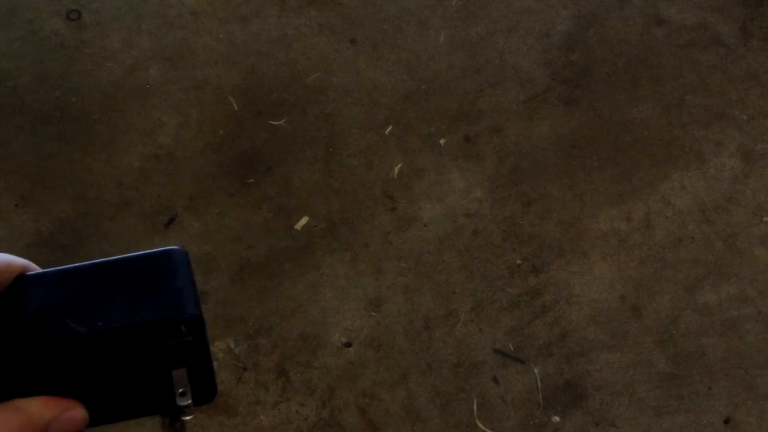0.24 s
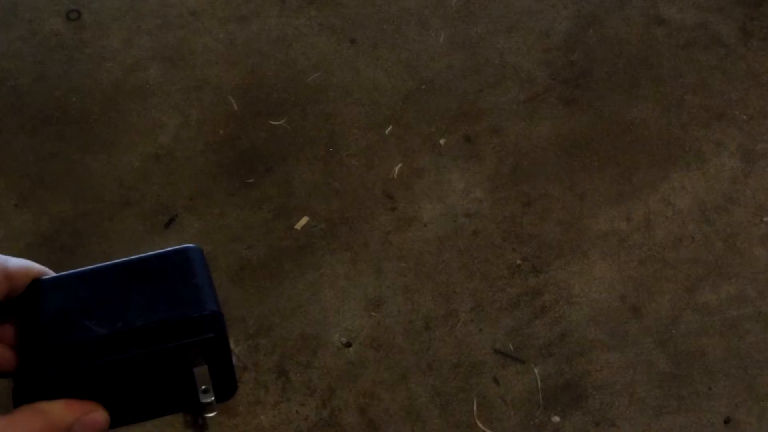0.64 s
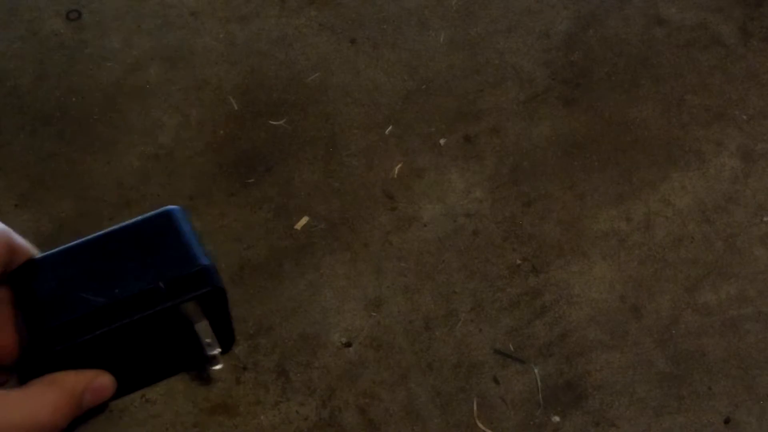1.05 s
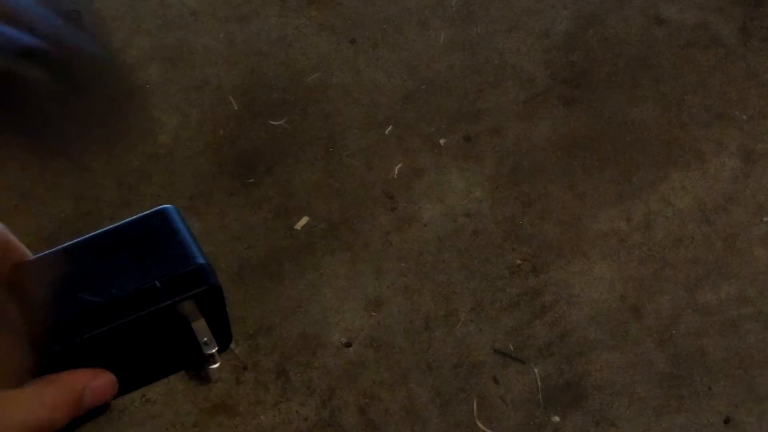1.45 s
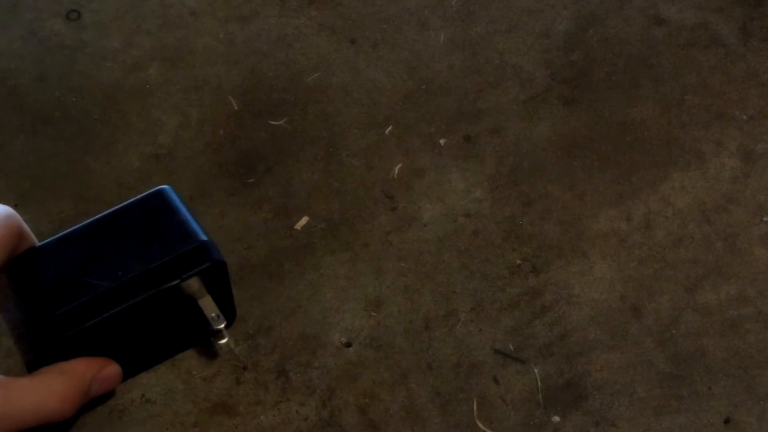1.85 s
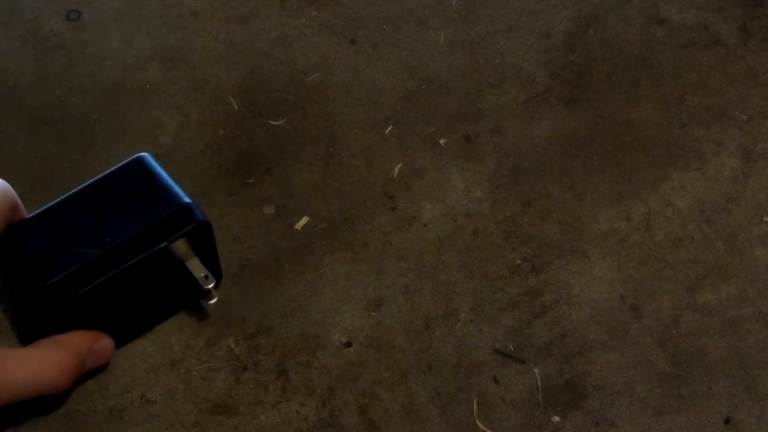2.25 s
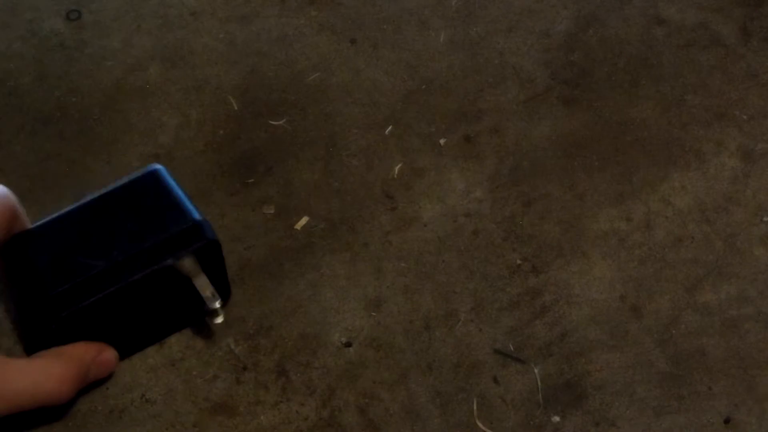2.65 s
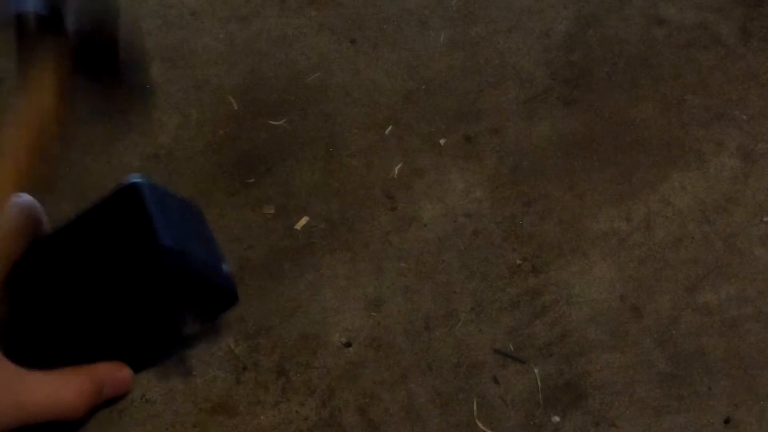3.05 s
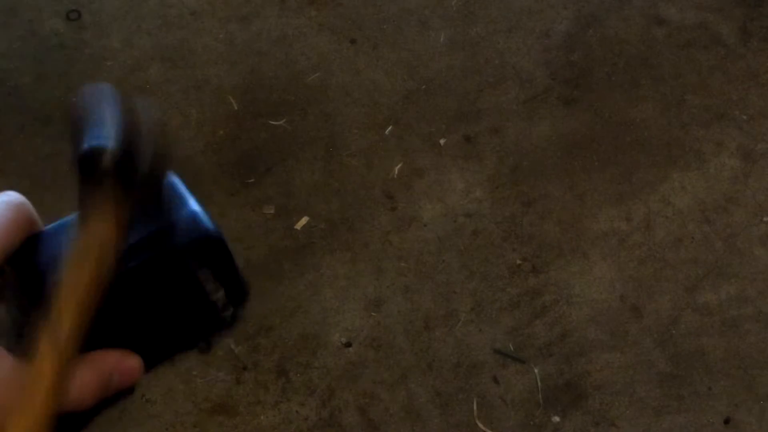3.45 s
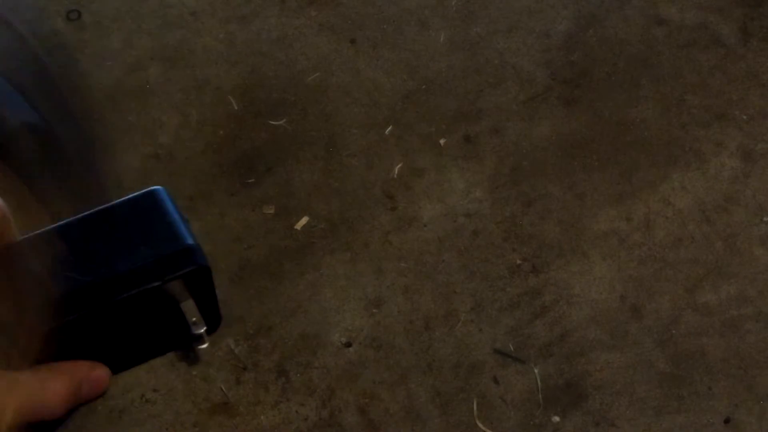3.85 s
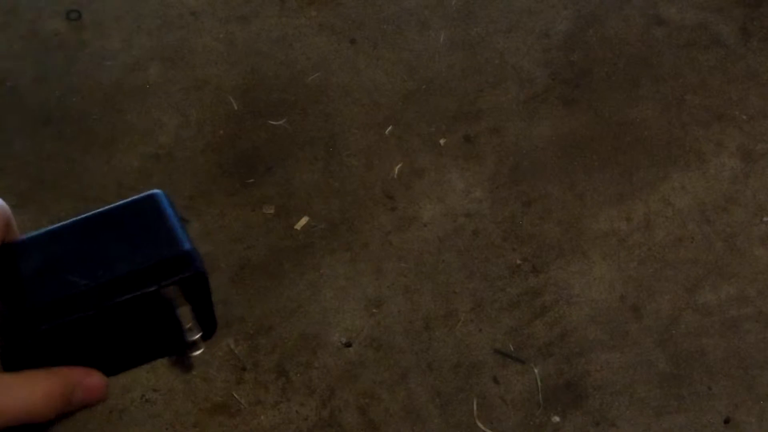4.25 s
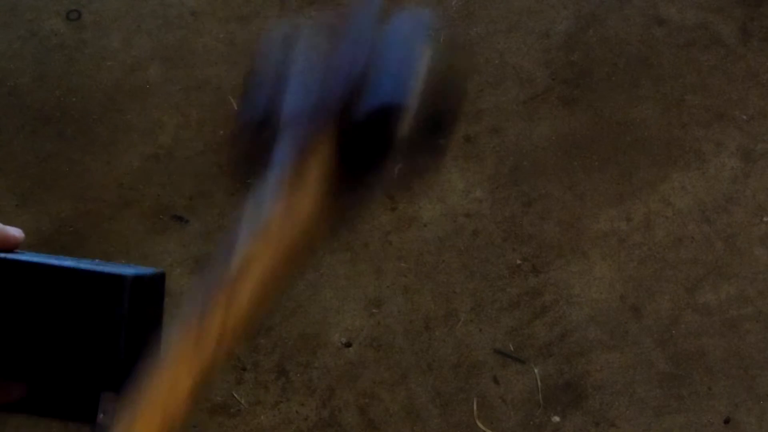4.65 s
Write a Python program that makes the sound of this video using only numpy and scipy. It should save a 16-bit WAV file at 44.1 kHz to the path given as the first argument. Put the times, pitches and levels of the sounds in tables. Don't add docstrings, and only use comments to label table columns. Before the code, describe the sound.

A hammer cracks a hollow plastic adapter on a concrete floor nine times, overloading the close microphone, with garage ring, scrapes and ticking chips.

```python
import sys
import numpy as np
from scipy import signal
from scipy.io import wavfile

SR = 44100
rng = np.random.default_rng(int(sys.argv[2]) if len(sys.argv) > 2 else 0)


def ratio(d):
    e = np.asarray(d, float) / 20
    return 10 ** e


def generate_wav(signal):
    frames = np.transpose(np.atleast_2d(signal))
    scaled = np.clip(frames, -1, 1) * 32767
    pcm = np.round(scaled).astype(np.int16)
    wavfile.write(sys.argv[1], SR, pcm)


N = 211661
LEAD = SR // 2


def rms_one(x):
    return x / np.sqrt(np.mean(x ** 2) + 1e-20)


def at_hz(points, hz, column=1):
    points = np.array(points)
    return np.interp(np.log(hz), np.log(points[:, 0]), points[:, column])


def resonate(x, modes):
    out = 0
    for k, (hz, width_hz, db) in enumerate(modes):
        r = np.exp(-np.pi * width_hz / SR)
        a = [1, -2 * r * np.cos(2 * np.pi * hz / SR), r * r]
        b = [(1 - r * r) / 2, 0, -(1 - r * r) / 2]
        sign = (-1) ** k
        out = out + sign * ratio(db) * signal.lfilter(b, a, x)
    return out


def filtered(x, kind, order, hz):
    return signal.sosfilt(signal.butter(order, hz, kind, fs=SR, output="sos"), x)


def add(track, s, sound):
    i = LEAD + round(s * SR)
    track[:, i:i + sound.shape[-1]] += sound


def bands(size):
    edges = 14 * 2 ** np.arange(0, 10.3, .4)
    white = rng.standard_normal((2, 2, size))
    for k, (low, high) in enumerate(zip(edges, edges[1:])):
        mid, side = filtered(white[k % 2], "band", 2, [low, high])
        yield np.sqrt(low * high), mid, side


def spread(mid, side, alike):
    alike = np.clip(alike, 0, 1)
    return np.sqrt(1 + alike) * mid + np.sqrt(1 - alike) * side * [[1], [-1]]


# [f/Hz, level/dB per Hz]
FLOOR_COLOUR = [(8.8, -32), (15, 2.5), (85, -6.5), (124, -11.5), (214, -20), (556, -26), (13400, -41),
                (15000, -66)]
# [t/s, level/dB]
RUMBLE_SWELL = [
    (0.0, -60),
    (0.39, -56),
    (2.0, -56.5),
    (2.5, -62.5),
    (3.5, -58.5),
    (4.25, -58.5),
    (4.8, -53.5),
]
FLOOR_DB = -54
WHINE_HZ, WHINE_DB, WHINE_END_S = 13194, -78, 1.8
SHAKE_DB_PER_PUSH, SHAKE_S = 23.5, 0.083


def background():
    t = np.arange(N) / SR
    whine = ratio(WHINE_DB) * np.sin(2 * np.pi * WHINE_HZ * t) * (t < WHINE_END_S)
    swell_db = np.interp(t, *np.transpose(RUMBLE_SWELL)) + 58
    for s, *_, push in HAMMER_BLOWS:
        swell_db += SHAKE_DB_PER_PUSH * abs(push) * (t > s) * np.exp(-np.abs(t - s) / SHAKE_S)
    noise = 0
    for hz, mid, side in bands(N):
        level = ratio(at_hz(FLOOR_COLOUR, hz) + swell_db * (hz < 250))
        alike = .95 - 0.042 * np.log2(1 + hz / 100)
        noise = noise + level * spread(mid, side, alike)
    return ratio(FLOOR_DB) * rms_one(noise) + whine


# [f/Hz, level/dB, time for the first decay to fall 60 dB/s, late tail level/dB,
# left-right likeness 0 to 1]
GARAGE_RING = [(49, 0, 0.14, -21, 0.86), (243, 0, 0.28, -26.5, 0.99), (690, 0.5, 0.39, -28.5, 0.98),
               (1480, -3.5, 0.37, -13.5, 0.92), (2670, -3.5, 0.41, -14, 0.64),
               (4340, -1, 0.36, -14.5, 0.44), (7800, -3, 0.37, -16.5, 0.052), (14000, -5, 0.34, -25.5, .08)]
# [t/ms, width/ms, boost below 3 kHz/dB, boost above 8 kHz/dB]
EARLY_ECHOES = [
    (11.0, .7, 7, 1),
    (15.2, 1.3, 4, 7),
    (22.5, 1.2, 2, 4),
    (33.8, .6, 5, 1),
    (45.8, .6, 4, 0),
]
# [t/ms, level/dB]
WALL_SLAPS = [
    (10.9, 16),
    (33.6, 13),
]
LATE_T60_S, FIRST_WALL_S, BUILD_S, LUMPY_DB, LUMPY_S = 0.68, 0.0047, 0.0027, -2, 0.057


def garage(x):
    t = np.arange(round(1.1 * SR)) / SR
    after = np.maximum(t - FIRST_WALL_S, 0)
    lumps = np.repeat(rng.standard_normal(len(t) // 32 + 1), 32)[:len(t)]
    build = (1 - np.exp(-after / BUILD_S)) * ratio(LUMPY_DB * lumps * np.exp(-after / LUMPY_S))
    answer = 0
    for hz, mid, side in bands(len(t)):
        first = ratio(-60 * after / at_hz(GARAGE_RING, hz, column=2))
        late = ratio(at_hz(GARAGE_RING, hz, column=3) - 60 * after / LATE_T60_S)
        boost_db = 0
        for ms, width_ms, low_db, high_db in EARLY_ECHOES:
            height_db = at_hz([(3000, low_db), (8000, high_db)], hz) * (hz > 500)
            boost_db = boost_db + height_db * np.exp(-((1000 * t - ms) / width_ms) ** 2)
        gain = ratio(at_hz(GARAGE_RING, hz) + boost_db) * np.sqrt(first ** 2 + late ** 2)
        answer = answer + gain * spread(mid, side, at_hz(GARAGE_RING, hz, column=4))
    answer = answer * build
    for ms, db in WALL_SLAPS:
        answer[:, round(ms * SR / 1000)] += ratio(db)
    mono = x.mean(axis=0)[None]
    return signal.fftconvolve(mono, answer, axes=1)[:, :x.shape[1]]


def burst(ms, alike, size):
    t_ms = np.arange(size) / SR * 1000
    grains = rng.standard_normal((2, size)) * ratio(1.9 * rng.standard_normal(size))
    return spread(*grains, alike) * np.minimum(t_ms / 0.15, 1) * np.exp(-(t_ms / ms) ** 2)


def scattered_click(size):
    click = signal.unit_impulse(size)
    for lag in rng.integers(5, 60, 5):
        gap = np.zeros(lag - 1)
        click = signal.lfilter(np.r_[-.6, gap, 1], np.r_[1, gap, -.6], click)
    return click[None]


# [f/Hz, width/Hz, level/dB]
LOW_MODES = [(1681, 603, -3), (2090, 516, 0)]
MIDDLE_MODES = [(2597, 366, 1), (3208, 677, -1.5)]
HIGH_MODES = [(3626, 593, 0), (4190, 985, -4.5), (5210, 870, -3.5)]
# [f/Hz, width/Hz, level/dB]
CRACK_MODES = [(7080, 4400, 3.5), (10370, 2900, 5.5), (14000, 2700, 4)]
# [f/Hz, width/Hz, level/dB]
HOLLOW_MODES = [(273, 120, -2), (442.4, 350, -3.5), (650, 170, 1), (1134, 490, 0)]
CRACK_FOLLOWS = .9


def shell(contact, thud_db, middle_db, bright_db):
    low = resonate(contact, LOW_MODES)
    middle = ratio(middle_db) * resonate(contact, MIDDLE_MODES)
    high = ratio(bright_db) * resonate(contact, HIGH_MODES)
    hollow = ratio(thud_db) * resonate(contact, HOLLOW_MODES)
    crack = ratio(CRACK_FOLLOWS * bright_db - 11.5) * resonate(contact, CRACK_MODES)
    return low + middle + high + hollow - crack


# [t/s, level/dB, middle shell modes level/dB, brightness level/dB, overload push -1 to 1]
HAMMER_BLOWS = [
    (0.101, 1, 0, -0.5, .005),
    (0.483, 0, 0.5, 1.5, -.03),
    (0.8689, 0.5, -0.5, 1, -.015),
    (1.62, 3, -3, -1.5, -.015),
    (2.1241, -1, -1, 0.5, 0.11),
    (2.6377, -3, -2.5, 0, -0.098),
    (3.119, 1, -1, -1, -.1),
    (3.5624, 0, -4, -0.5, -0.21),
    (4.004, 7.5, -2, -2, -.27),
]
OTHER_BLOWS = [
    (-0.33, -2, -1.5, -2, 0),
    (2.1459, -12, 1, -0.46, 0),
]
# [f/Hz, width/Hz, level/dB]
WALL_RINGS = [(3300, 1800, -6), (2530, 310, -7.5), (3370, 600, -3.5), (3040, 910, -0.5), (1660, 330, -1.5),
              (4000, 200, -6), (700, 220, -2.5), (676, 710, -1.5), (6000, 1000, -13)]
# [f/Hz, width/Hz, level/dB]
REBOUND_RING = (4100, 1200, 4.2)
# [f/Hz, width/Hz, level/dB]
SLAB_MODES = [(58, 27, -11), (99, 57, -9.5)]
CONTACT_MS, AFTER_SHAKE_MS = 4.7, 9.6
THUD_DB, LOOSENS_DB_PER_S = -11, 0.66


def blows():
    direct, sent = np.zeros((2, 2, N + 2 * LEAD))
    contacts = [*OTHER_BLOWS, *HAMMER_BLOWS]
    walls = [WALL_RINGS[0], REBOUND_RING, *WALL_RINGS]
    for (s, db, middle_db, bright_db, _), wall in zip(contacts, walls):
        thud_db = THUD_DB + LOOSENS_DB_PER_S * s
        crunch = burst(CONTACT_MS, 0.71, size=4096)
        after_shake = ratio(-11.5) * burst(AFTER_SHAKE_MS, 0.37, size=4096)
        heard = shell(crunch + after_shake, thud_db - 0.5, middle_db, bright_db)
        add(direct, s, ratio(db + 12.5) * (heard + resonate(heard, [wall])))
        click = scattered_click(size=4096)
        around = shell(click, thud_db, middle_db, bright_db)
        add(sent, s, ratio(db) * (around + resonate(around, [wall]) + resonate(click, SLAB_MODES)))
    return filtered(direct, "high", 2, 220), sent


# [t/s, peak level/dB, f/Hz]
HOUSING_BOUNCES = [
    (0.563, -13, 1340),
    (0.614, -19, 1900),
    (1.096, -30, 985),
    (1.729, -14, 1840),
    (2.244, -16, 977),
    (2.765, -22, 1510),
    (3.686, -16, 1820),
    (3.751, -21, 1800),
    (4.118, -7, 1700),
]
BOUNCE_WIDTH_HZ = 440


def bounces():
    out = np.zeros((2, N + 2 * LEAD))
    touch = np.r_[np.hanning(8), np.zeros(2040)]
    for s, db, hz in HOUSING_BOUNCES:
        knock = resonate(touch, [(hz, BOUNCE_WIDTH_HZ, 0), (1.6 * hz, 900, -10), (9000, 6000, -14)])
        add(out, s + .001, ratio(db + 3.5) * knock[None] / np.abs(knock).max())
    return out


def stroke(t, start, length, db, sag_db):
    edge_s = .012
    edges = np.clip(np.minimum(t - start, start + length - t) / edge_s + .5, 0, 1)
    return edges * ratio(db - sag_db * np.clip(t - start, 0, length))


def rubbing(strokes, modes, channels):
    t = np.arange(-LEAD, N + LEAD) / SR
    level = sum(stroke(t, *row) for row in strokes)
    catches = np.repeat(rng.standard_normal(len(t) // 256 + 1), 256)[:len(t)]
    uneven_db = 4 * rng.standard_normal(len(t)) + 2.5 * catches
    grit = rng.standard_normal((channels, len(t))) * ratio(uneven_db)
    return level * rms_one(resonate(grit, modes))


# [start t/s, length t/s, level/dB, sag/dB per s]
SHOVES = [
    (1.05, 0.19, -43.5, 40),
    (2.8, .2, -40, 66),
    (3.3, 0.3, -40.5, 98),
    (3.76, 0.24, -47, 7),
    (4.3, 0.24, -50, 32),
    (4.55, .18, -48.5, 50),
]


def drag():
    modes = [(1330, 750, -7.5), (1980, 280, -1), (2756, 360, -7.5), (4170, 200, -3.5), (6800, 4500, -14)]
    return rubbing(SHOVES, modes, channels=1)


# [start t/s, length t/s, level/dB, sag/dB per s]
GRIT_STROKES = [
    (1.15, 0.14, -46, 58),
    (3.42, .13, -50, 17),
    (3.87, .12, -52, -15),
    (4.32, 0.186, -61.5, -70),
    (4.53, .27, -48, 63),
]
# [t/s, peak level/dB, f/Hz]
CHIP_LANDINGS = [(1.2196, -22, 12600), (1.7709, -2, 10400), (1.8624, -33, 12800), (1.8816, -16, 9010),
                 (2.2702, -5, 11200), (2.4254, -26, 10300), (2.4339, -30, 9940), (2.5795, -37, 12900),
                 (2.597, -39, 12900), (3.274, -21, 11200), (3.3019, -22, 8770), (3.5279, -31, 11700),
                 (3.8886, -24, 13600), (3.8934, -26, 13600), (3.9074, -26, 11700), (4.4747, -30, 13600),
                 (3.9268, -27, 13300), (3.9424, -16, 8710), (3.9504, -26, 9810), (4.1654, -22, 12300),
                 (4.1794, -19, 11900), (4.342, -19, 10900), (4.3615, -32, 13600), (4.3909, -29, 13900),
                 (4.5466, -26, 13800), (4.6239, -37, 13200)]
# [first touch t/s, last touch t/s, hop t/s, peak level/dB]
CRUMB_SKIPS = [
    (1.1757, 1.2105, .0116, -30),
    (3.4396, 3.4736, .017, -33),
    (4.4864, 4.4994, .013, -34),
    (4.5389, 4.5524, .0135, -30),
]
CRUMB_HZ, HOP_SPREAD_DB, CHIP_RATTLE_MS = 13300, 1.5, .8
CHIP_PAN_DB, PAN_SPREAD_DB = -.4, .9


def chips():
    out = rubbing(GRIT_STROKES, [(9660, 3000, -8.5), (13000, 2500, -2.5)], channels=2)
    hops = []
    for first, last, hop, db in CRUMB_SKIPS:
        for s in np.arange(first, last + hop / 2, hop):
            hops.append((s, db + HOP_SPREAD_DB * rng.standard_normal(), CRUMB_HZ))
    for s, db, hz in [*CHIP_LANDINGS, *hops]:
        shiver = ratio(-14) * burst(3.5, .3, size=1024)
        rattle = burst(CHIP_RATTLE_MS, .5, size=1024) + shiver
        tick = resonate(rattle, [(hz, 2500, 0), (13600, 2500, 1), (8500, 3000, -9), (2500, 2500, -14)])
        pan_db = CHIP_PAN_DB + PAN_SPREAD_DB * rng.standard_normal()
        level = ratio(db + 3 + pan_db * np.array([[.5], [-.5]]))
        add(out, s + .0007, level * tick / np.abs(tick).max(axis=1, keepdims=True))
    return out


def scene():
    hammer, sent = blows()
    housing = bounces() + drag()
    splinters = chips()
    room = garage(ratio(3) * sent + ratio(-37.5) * housing + ratio(-47) * splinters)
    return (hammer + housing + splinters + room)[:, LEAD:LEAD + N] + background()


def band_limit(x):
    return signal.sosfilt(signal.butter(12, 15480, fs=SR, output="sos"), x)


PUSH_S, PUSH_UNEVEN = .0135, .035


def record(dry):
    push = np.zeros((2, N + 2 * LEAD))
    bump = 2.1 * np.hanning(round(PUSH_S * SR))
    for s, *_, shift in HAMMER_BLOWS:
        left_right = shift + PUSH_UNEVEN * rng.standard_normal() * np.array([1, -1])
        add(push, s, np.outer(left_right, bump))
    push = filtered(push, "high", 2, 4.0)[:, LEAD:LEAD + N]
    loud = np.clip(1.094 * np.tanh((dry + push) / 1.234), -1, 1)
    top_cut = signal.cheby2(14, 35, 14450, fs=SR, output="sos")
    mix = np.clip(signal.sosfilt(top_cut, loud), -1, 1)
    return band_limit(mix)


dry = scene()
out = record(dry)
generate_wav(out)
```